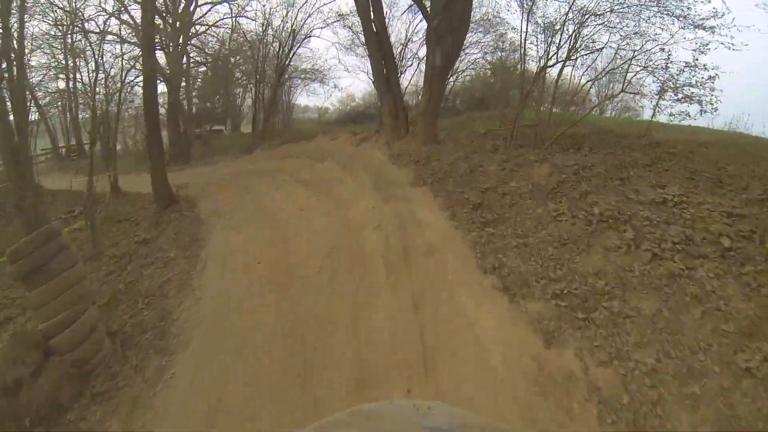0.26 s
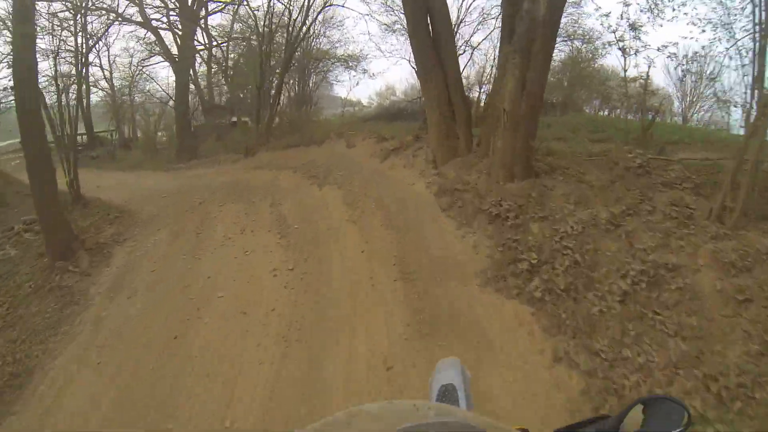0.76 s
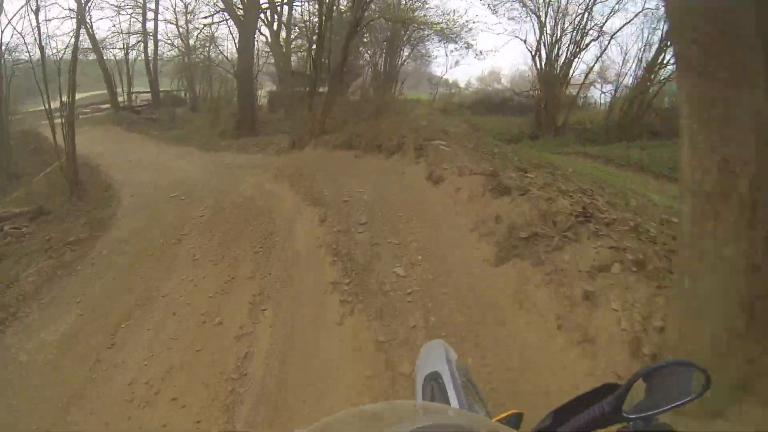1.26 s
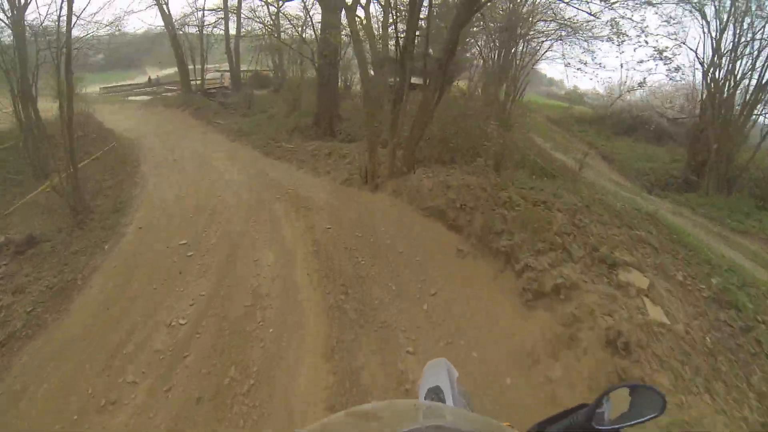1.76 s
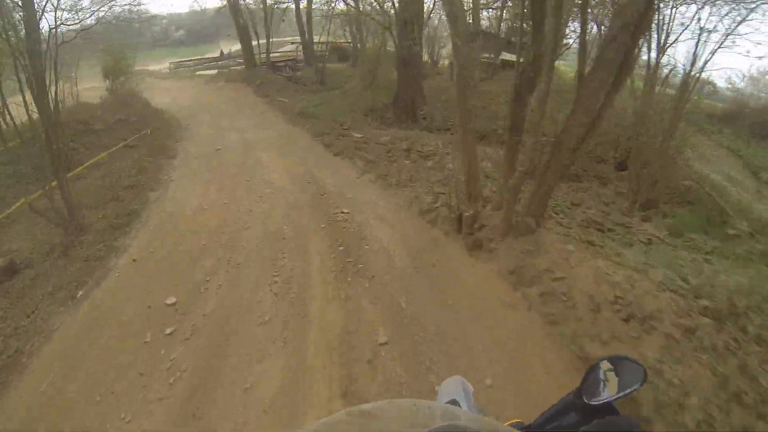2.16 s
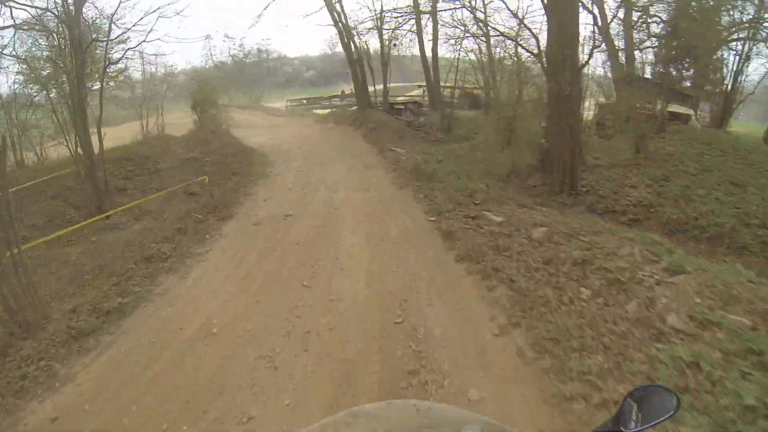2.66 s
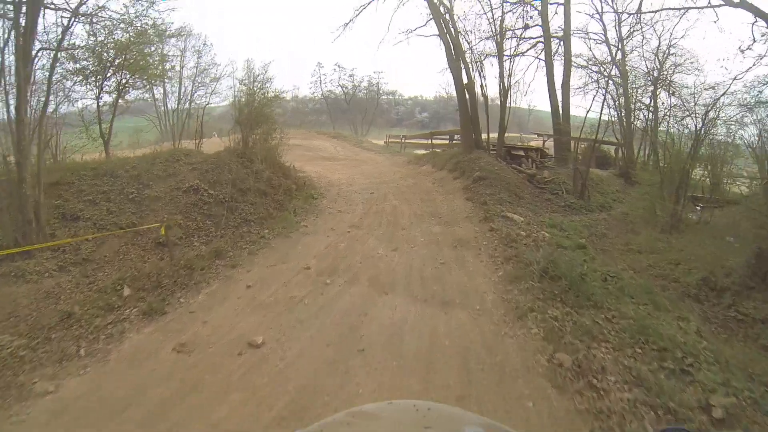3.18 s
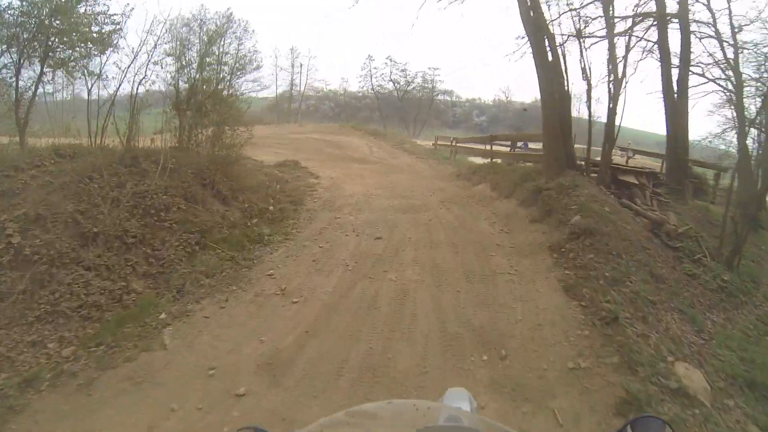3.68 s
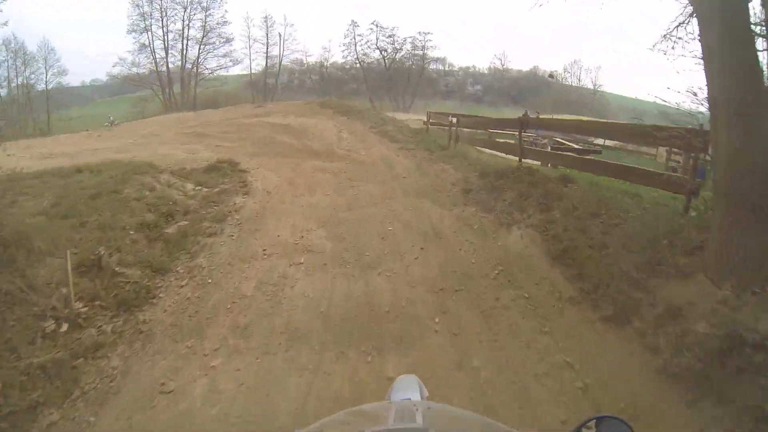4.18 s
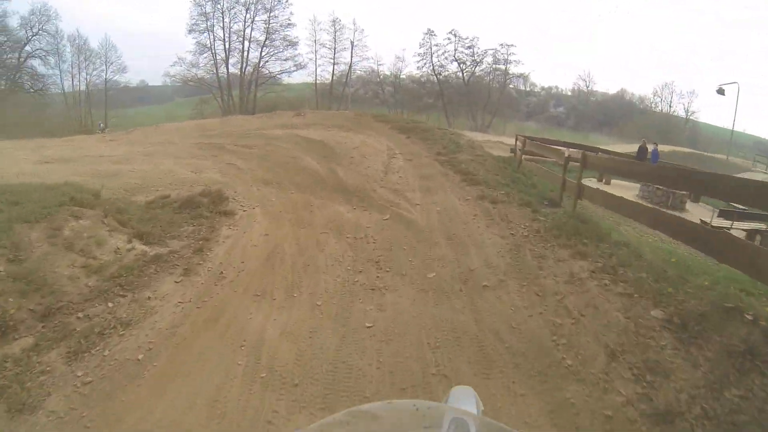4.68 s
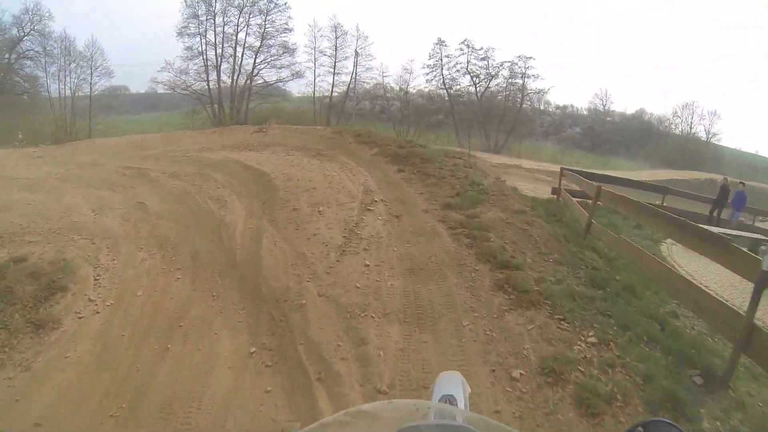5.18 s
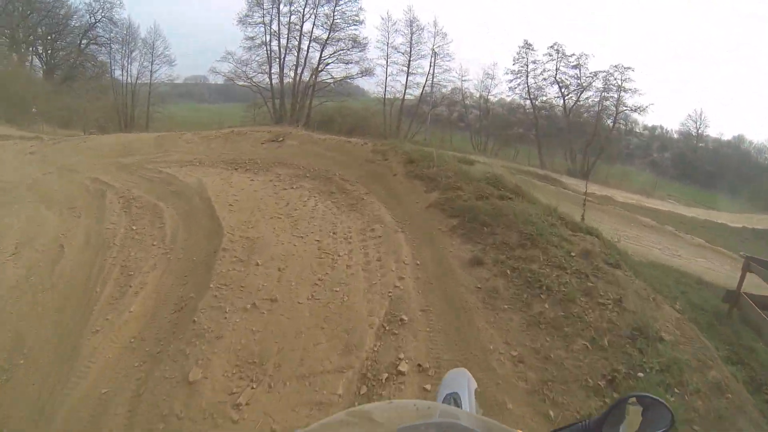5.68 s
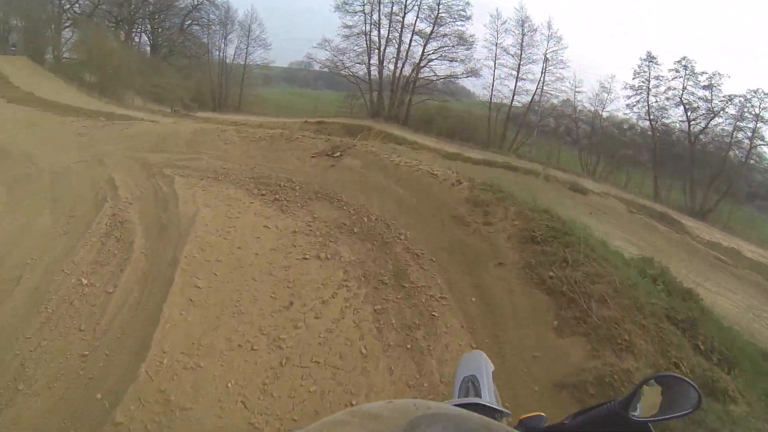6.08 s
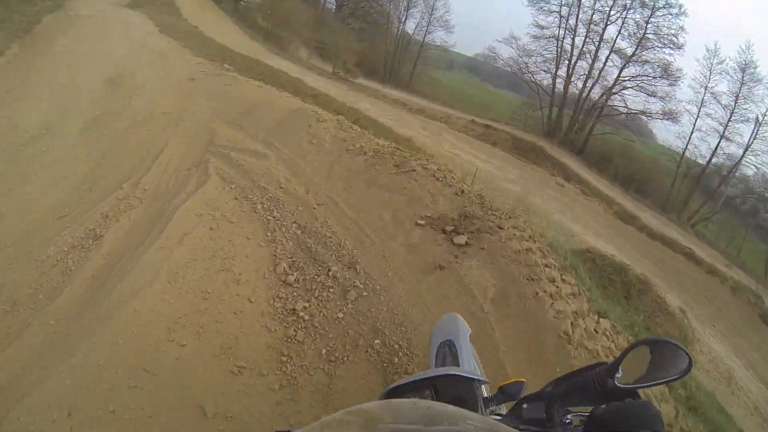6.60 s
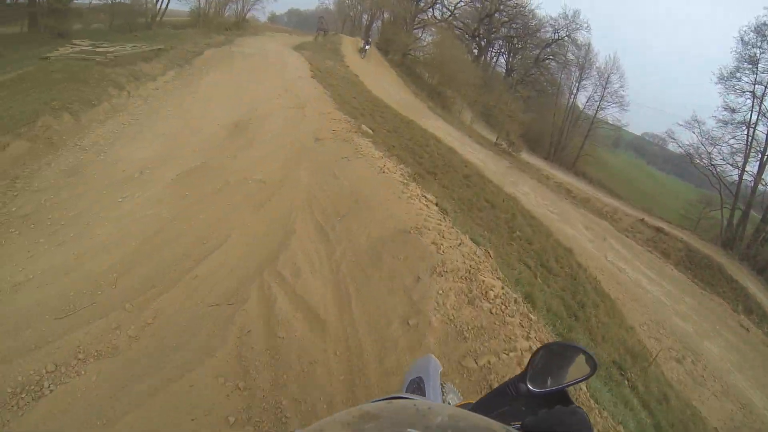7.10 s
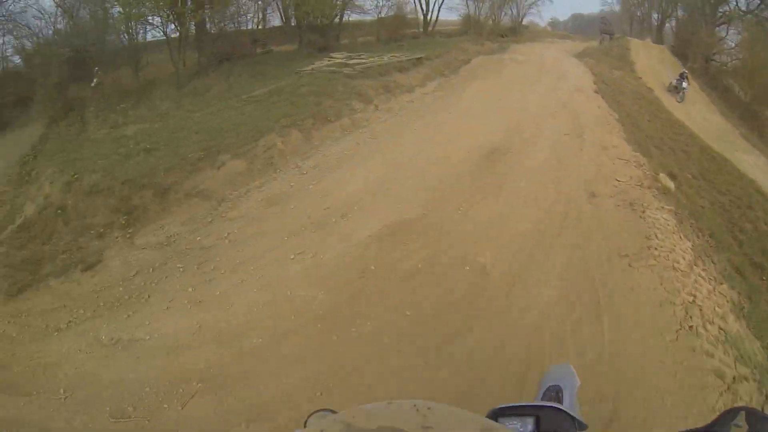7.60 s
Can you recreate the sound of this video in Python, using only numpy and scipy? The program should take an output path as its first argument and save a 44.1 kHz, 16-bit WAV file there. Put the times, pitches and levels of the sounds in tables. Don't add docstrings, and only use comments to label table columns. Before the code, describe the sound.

Close, boxy onboard sound of an off-road motorcycle: low uneven exhaust beats, chain and valve clatter, buzzing panels and deep fluttering wind on the microphone. Revs fall at first, then climb in a hard pull and waver over bumps with brief squeaks and suspension hisses. The throttle closes, a cluster of pops follows, the engine slows to a lumpy chug, and then a loud, knocking acceleration ends it.

```python
import sys
import numpy as np
from scipy import signal
from scipy.fft import rfft, irfft
from scipy.io import wavfile
from scipy.ndimage import uniform_filter1d

SR = 44100
rng = np.random.default_rng(int(sys.argv[2]) if len(sys.argv) > 2 else 0)


def level_to_linear(level):
    exponent = np.asarray(level, float) / 20
    return 10 ** exponent


def int16_out(signal):
    q = np.round(np.clip(np.atleast_2d(signal).T, -1, 1) * 32767)
    wavfile.write(sys.argv[1], SR, q.astype(np.int16))


N = 346185
time = np.arange(N) / SR
CRUISE_HZ, CRUISE_DB = 25, -40
GUST_CEILING = .9

# f/Hz, width/Hz, lift over the smooth colour/dB
CASE = [(630.7, 16.4, 9), (863, 146, 1.5), (1091, 142, 6.5), (1381, 74, 2.5), (1546, 87, 5), (1939, 150, 4),
        (2735, 680, 6), (3630, 750, 6.5), (5160, 950, 7), (6550, 1050, 9.5), (9370, 900, 2)]
# t/s, length/s, level/dB
FORK = [
    (0.03, 0.11, -45),
    (0.43, 0.047, -45),
    (3.126, 0.21, -41.5),
    (3.843, 0.13, -41.5),
    (4.108, 0.17, -41),
    (6.46, 0.076, -45.5),
]
# t/s, steady buffet/dB, shedding pitch/Hz
AIRFLOW = [(0, -11, 35.1), (.05, -28, 37), (.9, -22, 35.06), (1.48, -23, 37.93), (1.6, -32, 42.2),
           (1.85, -24, 40.8), (2.2, -25.5, 41.23), (2.45, -26.5, 46.18), (2.75, -24.5, 36.15),
           (3.3, -23, 36), (4.45, -20, 35.93), (4.95, -23, 37.12), (5.2, -23, 36.13), (6.9, -23.5, 35.75),
           (7.08, -21.5, 35.74), (7.3, -24, 35.88), (7.68, -22, 39.2), (7.85, -36, 37.6)]


def unit(x):
    return x / np.sqrt(np.mean(x ** 2))


def curves(table):
    s, *columns = np.transpose(table)
    return [np.interp(time, s, c) for c in columns]


def hiss():
    return rng.standard_normal(N)


def ring(x, hz, width):
    return signal.lfilter(*signal.iirpeak(hz, hz / width, SR), x)


def ring_twice(x, hz, width):
    return ring(ring(x, hz, width), hz, width)


def modes(x, table):
    return sum((-1) ** k * level_to_linear(db) * ring(x, hz, width) for k, (hz, width, db) in enumerate(table))


def walk(rate):
    k = int(SR / rate)
    held = np.repeat(rng.standard_normal(N // k + 1), k)
    return unit(uniform_filter1d(uniform_filter1d(held, k), k)[:N])


def steady(x, span_s):
    k = int(span_s * SR)
    return x / np.sqrt(uniform_filter1d(uniform_filter1d(x ** 2, k), k) + 1e-12)


def bump(s, length):
    return np.exp(-.5 * ((time - s) / (length / 3)) ** 2)


def colour(x, tilt_db=0):
    # f/Hz, density/dB per Hz
    rattle_spectrum = [(40, -60.5), (100, -13), (150, -23.5), (330, -24.5), (400, -22.5), (725, -27.5),
                       (820, -23.5), (1550, -25), (1750, -26.5), (3900, -42), (4400, -46.5), (5800, -56.5),
                       (7600, -59.5), (13200, -62), (14800, -86.5)]
    hz = np.linspace(1, SR / 2, 4097)
    points, db = np.transpose(rattle_spectrum)
    db = np.interp(np.log(hz), np.log(points), db) + tilt_db * np.log2(hz / 2000)
    db = db + sum(lift / (1 + (2 * (hz - f) / width) ** 2) for f, width, lift in CASE)
    cepstrum = irfft(np.log(level_to_linear(db)))
    cepstrum[1:4096] *= 2
    cepstrum[4097:] = 0
    return signal.fftconvolve(x, irfft(np.exp(rfft(cepstrum)))[:4096])[:N]


def engine():
    # t/s, firings per second/Hz
    firing = [(0, 30), (.35, 28.9), (.85, 28.2), (1.0, 26.1), (1.35, 25.2), (1.6, 24.0), (1.85, 22),
              (2.1, 21.3), (2.3, 23.28), (2.74, 27.35), (2.93, 32.1), (3.12, 30.54), (3.44, 34.65),
              (3.69, 28.97), (3.93, 32.16), (4.34, 27.46), (4.79, 28.92), (6.32, 20.76), (6.36, 19.13),
              (7.26, 17.28), (7.36, 22.4), (7.52, 22.3), (7.68, 24.4), (7.85, 25.2)]
    # pipe overtone/dB, silencer/dB, upper pipe resonance/dB
    throttle = [(0, -41, -14, 5, -15), (.05, -54, 5, 10, 4), (.2, -52.5, 6.5, -3, 0),
                (.4, -39.5, -6, -3, 4), (.62, -42, -1, 2, 7), (.7, -42, -9, 1, 5), (.8, -36.5, -14, -4, 4),
                (.92, -45, -2, -1, -6), (1.05, -40.5, -12, -1, 8), (1.3, -51, 6, -3, -10),
                (1.45, -42, -9, -8, 0), (1.6, -39.5, -5, -12, 0), (1.72, -58, 3.5, -12, 9),
                (2.15, -49.5, -4.5, -8, -3), (2.4, -38, -14, -17, 2), (2.7, -33, -12, -6, 0),
                (2.8, -31, -6.5, 8.5, 8.5), (3.1, -31, -6.5, -6, 4.5), (3.3, -30, -7, -7.5, -3),
                (3.45, -32.5, -6, -8, -6.5), (3.65, -45.5, -1, 2, 2), (3.85, -44, -0.5, -3, 1.5),
                (3.97, -35.5, -7, -5, -2), (4.2, -48.5, 2, -12, -2), (5.4, -47.5, 0.5, -8, -13),
                (5.62, -45, -11, -5.5, -5), (5.8, -49.5, -1, -4, 2), (6.2, -50.5, 0.5, -17.5, 2),
                (6.75, -43, -2, -11, -11.5), (7.15, -41.5, -6.5, -12.5, -10.5),
                (7.35, -28, -11.5, -12, -10.5), (7.55, -31, -10, -12.5, -3.5), (7.85, -30, -23, -6, -2)]
    # t/s, level/dB
    drone = [(0.0, -31), (0.06, -54), (0.39, -37.5), (1.11, -40), (1.16, -51), (1.73, -39.5), (1.86, -64),
             (1.97, -46), (2.71, -40.5), (2.8, -40), (3.02, -47), (3.45, -43.5), (5.27, -41), (5.53, -48),
             (6.78, -41.5), (6.97, -50.5), (7.83, -36.5), (7.85, -42)]
    # order of the firing rate, level/dB
    frame_orders = [(2, 2.3), (4, -1.6)]
    rate_hz = curves(firing)[0]
    boom_db, bright_db, low_db, high_db = curves(throttle)
    overtone_db = boom_db + bright_db + 1.7 * walk(6)
    hum_db = curves(drone)[0] - 3 + 0.37 * walk(4)
    rattle_db = rattle_level(rate_hz, boom_db)

    cycles = np.cumsum(rate_hz) / SR + .834
    fired = np.flatnonzero(np.diff(np.floor(cycles)) > 0)
    chance = rng.standard_normal((len(fired), 2))
    pulses = np.zeros(N)
    jitter = (.00015 * SR * chance[:, 0]).astype(int)
    pulses[np.clip(fired + jitter, 0, N - 1)] = level_to_linear(1.5 * chance[:, 1])
    gas = np.exp(-(cycles % 1) / 1.5) * hiss()

    blows = exhaust_blows(fired, chance, rate_hz, boom_db)
    out = level_to_linear(boom_db) * steady(exhaust_boom(blows, gas, low_db, high_db), .15)
    out = out + level_to_linear(overtone_db) * steady(pipe_overtone(pulses, gas), .15)
    out = out + level_to_linear(hum_db) * steady(airbox_hum(pulses, rate_hz), .15)
    out = out + level_to_linear(rattle_db) * steady(rattle(cycles, rate_hz, boom_db), .15)
    shake = sum(level_to_linear(db + 2 * walk(14)) * np.sin(2 * np.pi * order * cycles) for order, db in frame_orders)
    return out + level_to_linear(hum_db) * shake


def exhaust_blows(fired, chance, rate_hz, boom_db):
    # t/s, level over a plain blow/dB
    pops = [
        (1.21, 6.5),
        (5.278, 3.5),
        (5.353, 10.5),
        (5.39, 11.5),
        (5.472, 15.5),
        (5.593, 18),
        (5.675, 18.5),
    ]
    blowdown_cycles, pipe_lead_s, sweep_s = .35, .009, .0022
    rate = rate_hz[fired]
    first_s = blowdown_cycles / rate - pipe_lead_s - sweep_s
    unevenness_db = np.clip((-30 - boom_db[fired]) / 8, 1, 1.8)
    blows, late = np.zeros(N), np.zeros(N)
    for train, wait_s in ((blows, first_s), (late, first_s + .5 / rate)):
        delay = (SR * (wait_s + .0002 * chance[:, 0])).astype(int)
        train[np.clip(fired + delay, 0, N - 1)] = level_to_linear(unevenness_db * chance[:, 1])
    for s, db in pops:
        blows[int(s * SR)] += level_to_linear(db)
    echo = np.clip((25.5 - rate_hz) / 3.5, 0, 1)
    echo = echo * np.clip((boom_db + 38) / 8, .15, 1)
    return blows + .65 * echo * late


def exhaust_boom(blows, gas, low_db, high_db):
    # f/Hz, width/Hz, level/dB
    boom_modes = [
        (193.3, 31.4, -2),
        (233.3, 29, 1.5),
        (266, 44.5, 0),
    ]
    sweep_s = .0022
    exhaust = unit(ring(blows, 260, 300)) + .15 * unit(ring(gas, 260, 300))
    parts = []
    for k, mode in enumerate(boom_modes):
        part = ring(modes(exhaust, [mode]), mode[0], 2 * mode[1])
        parts.append(np.roll(part, int(k * sweep_s * SR)))
    low, middle, high = parts
    boom = ring(middle - level_to_linear(low_db + 9) * low - level_to_linear(high_db - 0.5) * high, 229, 210)
    return boom + level_to_linear(-7.5) * ring(ring(exhaust, 690, 70), 385, 120)


def pipe_overtone(pulses, gas):
    # f/Hz, width/Hz, level/dB
    overtone_modes = [
        (329.4, 41.6, -1),
        (362.4, 27, -8.5),
    ]
    drive = unit(ring(pulses, 300, 430)) + 0.29 * unit(ring(gas, 300, 300))
    return ring(modes(drive, overtone_modes), 315, 95)


def airbox_hum(pulses, rate_hz):
    # f/Hz, width/Hz, level/dB
    hum_modes = [
        (93, 22, 0),
        (116.6, 37, 0),
    ]
    fast = np.clip((rate_hz - 19) / 11, 0, 1)
    breath = unit(ring(pulses, 105, 100)) + .3 * unit(ring(hiss(), 105, 100))
    shares = (1 - fast, fast)
    return sum(share * ring(modes(breath, [mode]), mode[0], 60) for share, mode in zip(shares, hum_modes))


def rattle(cycles, rate_hz, boom_db):
    throb = (0.19 + 0.0152 * (boom_db - CRUISE_DB)) * np.clip((35 - rate_hz) / 9, .45, 1)
    throb = np.clip(throb, 0, 1)
    phase = cycles % 1
    gate = unit(np.exp(-phase / 0.31) + 0.067 * np.exp(-((phase + .5) % 1) / 0.11))
    beat = 1 - throb + throb * uniform_filter1d(gate, size=150)
    grit = level_to_linear(2.33 * np.minimum(rng.exponential(size=N), 6) * (rng.random(N) < .1))
    out = colour(hiss() * grit * beat * level_to_linear(0.57 * walk(15)))
    out = out + sum(0.17 * walk(16) * ring(out, hz, width / 2) for hz, width, _ in CASE)
    thin = [hz * drift for hz, *_ in CASE[1:6] for drift in (.96, 1.03)]
    return out + sum(0.43 * np.maximum(walk(9), 0) * ring(out, hz, 33) for hz in thin)


def rattle_level(rate_hz, throttle_db):
    # level at cruise/dB, per octave of speed/dB, per throttle dB, per shaking dB, bump/dB, wander/dB
    law = (-38.5, 3, 0.0139, 1, 0.5, 0.48)
    # t/s, level/dB
    shaking = [(0, 2.5), (.1, 3.5), (.5, 2), (1.5, .5), (2.05, -1), (2.7, 1.5), (3.5, 3), (4.2, 1.5),
               (4.5, 1), (5.1, 1.5), (5.9, -2.5), (6.4, -2.5), (7.1, -2.5), (7.45, 0), (7.85, 1.5)]
    cruise_db, per_octave_db, per_throttle, per_shaking, bump_db, wander_db = law
    bumps = sum(bump(s, length) for s, length, _ in FORK)
    engine_db = per_octave_db * np.log2(rate_hz / CRUISE_HZ) + per_throttle * (throttle_db - CRUISE_DB)
    return cruise_db + engine_db + per_shaking * curves(shaking)[0] + bump_db * bumps + wander_db * walk(6)


def knocks():
    # t/s, peak/dB, treble/dB
    hard_firings = [(2.688, -26.5, -27), (2.766, -22.5, -26), (2.8, -22, -32), (2.835, -22, -37),
                    (2.866, -21, -36), (2.9002, -48, -27), (2.928, -26.5, -20), (6.8864, -26.5, -37),
                    (6.9397, -26.5, -33.5), (7.0494, -30, -27), (7.222, -24.5, -35), (7.280, -22, -30),
                    (7.329, -20, -21.5), (7.3777, -17, -29.5), (7.421, -17, -34), (7.465, -18.5, -37),
                    (7.5118, -17.5, -32), (7.5542, -21, -22.5), (7.5979, -21.5, -30), (7.6364, -25.5, -29),
                    (7.682, -20.5, -32), (7.7238, -20, -41), (7.764, -20.5, -28), (7.802, -25.5, -33),
                    (7.8375, -37, -25)]
    # f/Hz, width/Hz, level/dB
    crankcase = [
        (1109, 92, -5.5),
        (1544, 95, 6),
        (2035, 70, -6),
        (2850, 230, -12.5),
        (3760, 145, -7),
    ]
    span, lead_s = 2000, .012
    rebound_s = .0075
    body, top = np.zeros(N + span), np.zeros(N + span)
    age = time[:span] - lead_s
    fall = np.exp(-age / .005) + .8 * np.exp(-age / .0006)
    swell = np.where(age < 0, .35 * np.exp(age / .006), fall)
    swell = swell + 0.38 * (age > rebound_s) * np.exp(-np.abs(age - rebound_s) / 0.01)
    fall = np.exp(-age / 0.0018) + 0.52 * np.exp(-((age - rebound_s) / 0.0011) ** 2)
    crack = np.where(age < 0, np.exp(age / 0.0013), fall)
    for s, db, treble_db in hard_firings:
        noise = rng.standard_normal((2, span))
        thud = noise[0] * swell
        k = int((s - lead_s) * SR)
        body[k:k + span] += level_to_linear(db) * thud * np.linalg.norm(swell) / np.linalg.norm(thud)
        top[k:k + span] += level_to_linear(db + treble_db) * noise[1] * crack
    ringing = level_to_linear(7) * modes(body[:N], crankcase)
    clatter = colour(body[:N], tilt_db=4.0) / np.std(colour(hiss(), tilt_db=-1.0))
    treble = ring(colour(top[:N], tilt_db=11.5), 7200, 11000) / np.std(colour(hiss(), tilt_db=16.0))
    return ringing + level_to_linear(-5) * ring(clatter, 1800, 2400) + level_to_linear(4.5) * ring(treble, 6700, 9000)


def wind():
    hz, buffet_db = airflow()
    slow_db = buffet_db - 4.5 + 5.5 * np.minimum(walk(12), GUST_CEILING)
    tone = np.sqrt(2) * np.cos(2 * np.pi * np.cumsum(hz * (1 + 0.04974 * walk(12))) / SR)
    eddies = unit(ring_twice(hiss(), 35.8, 18.9))
    slow = ring(ring_twice(hiss(), 19.5, 19), 23.8, 33)
    buffets = level_to_linear(buffet_db + 1.5 * walk(50)) * steady(tone + .4 * eddies, .04)
    pressure = level_to_linear(slow_db) * steady(slow, .05)
    rumble = level_to_linear(curves(AIRFLOW)[0] - 13 + 2.5 * walk(14)) * unit(ring_twice(hiss(), 62, 30))
    low_pass = signal.butter(3, 64, fs=SR, output="sos")
    return signal.sosfiltfilt(low_pass, buffets + pressure + rumble, padtype="even")


def airflow():
    # t/s, level/dB, length/s, shedding pitch/Hz
    gust_events = [(0.082, -6.5, 0.084, 36.1), (0.224, -17.5, 0.028, 36.9), (0.306, -22.5, 0.026, 37.2),
                   (0.348, -17.5, 0.03, 38.7), (0.474, -17, 0.023, 40), (0.598, -15.5, 0.071, 36.5),
                   (0.737, -11, 0.07, 37.4), (0.947, -15.5, 0.047, 39.3), (1.141, -13, 0.17, 36.36),
                   (1.24, -21, 0.063, 33.7), (1.381, -11, 0.16, 36.9), (2.158, -19, 0.059, 36.4),
                   (2.231, -19, 0.042, 36.5), (3.205, -19.5, 0.05, 36.56), (3.274, -19, 0.034, 34.7),
                   (3.363, -22, 0.071, 38.6), (3.488, -15.5, 0.11, 41), (3.579, -16.5, 0.02, 36.7),
                   (3.663, -21.5, 0.037, 36.9), (3.762, -10, 0.039, 33.9), (3.848, -16, 0.067, 34.6),
                   (3.922, -20.5, 0.051, 33), (3.984, -12.5, 0.073, 34.4), (4.168, -11, 0.1, 35.9),
                   (4.281, -10.5, 0.045, 37.98), (4.349, -19, 0.061, 39.2), (4.544, -16.5, 0.075, 32.66),
                   (4.759, -16, 0.075, 36.1), (4.876, -15, 0.038, 41.9), (4.905, -24.5, 0.031, 38.7),
                   (5.019, -22, 0.092, 35.8), (5.146, -18, 0.11, 42.7), (5.288, -18.5, 0.099, 38.4),
                   (5.368, -15.5, 0.036, 37.9), (5.39, -19, 0.033, 39.1), (5.513, -20.5, 0.053, 36.57),
                   (5.576, -16, 0.035, 36.4), (5.769, -18, 0.071, 40.9), (5.834, -7, 0.037, 36.7),
                   (5.969, -8, 0.15, 37.2), (6.191, -17, 0.084, 39.03), (6.332, -15, 0.054, 36.5),
                   (6.461, -19.5, 0.061, 36.5), (6.562, -13, 0.11, 37.75), (6.68, -14.5, 0.055, 35.5),
                   (6.764, -20, 0.065, 36.83), (7.135, -23.5, 0.089, 33.3), (7.343, -17, 0.087, 36.15),
                   (7.526, -19.5, 0.11, 37.44), (7.662, -34, 0.08, 41.2)]
    lulls = [.04, .33, .42, .67, .85, .93, 1.02, 1.32, 1.61, 1.7, 1.76, 1.88, 2.05, 2.2, 2.38, 2.67, 2.74,
             2.83, 3.09, 3.26, 3.42, 3.73, 3.94, 4.07, 4.47, 4.61, 4.84, 4.95, 5.21, 5.43, 5.46, 5.485,
             5.64, 5.72, 5.8, 6.1, 6.245, 6.27, 6.38, 6.86, 7.18, 7.195, 7.29, 7.45, 7.59, 7.74]
    stream_db, stream_hz = curves(AIRFLOW)
    flutter_db = -0.5 * np.minimum(walk(22), GUST_CEILING)
    total = level_to_linear(2 * (stream_db + flutter_db))
    weighted_hz = total * stream_hz
    for s, db, length, hz in gust_events:
        power = level_to_linear(2 * db) * gust(s, length)
        total = total + power
        weighted_hz = weighted_hz + power * hz
    lull_db = -5.5 * sum(bump(s, 0.053) for s in lulls)
    return weighted_hz / total, 10 * np.log10(total) + lull_db


def gust(s, length):
    wake = np.exp(-2 * np.maximum(time - s, 0) / 0.0902) * (1 - bump(s, length)) * (time > s)
    return bump(s, length) ** 2 + level_to_linear(2 * -4) * wake


def chassis():
    # t/s, peak/dB, f/Hz, width/Hz
    stones = [(.428, -58, 9500, 2500), (2.836, -30, 1850, 300), (2.845, -31, 1900, 300),
              (2.806, -34, 1800, 300), (2.783, -34, 1950, 300), (2.972, -35, 1500, 400),
              (4.976, -32, 600, 900), (2.776, -36, 1900, 400), (6.501, -27, 1400, 900),
              (6.652, -47, 4200, 2500), (6.657, -47, 4500, 2500), (6.688, -56, 6500, 2000),
              (6.715, -54, 5200, 1500), (6.738, -36, 1200, 600)]
    # t/s, length/s, f/Hz, level/dB, glide/Hz per s
    squeaks = [(3.63, .14, 6200, -66, 0), (4.79, .09, 975, -40, -500), (4.85, .07, 910, -40, -200),
               (6.45, .2, 650, -50, 0), (7.13, .09, 6750, -61, 0), (3.47, .07, 1450, -43, 0),
               (3.59, .12, 1560, -47, 0), (3.79, .09, 1340, -45, -300), (3.9, .08, 905, -43, 0),
               (4.09, .12, 1570, -45, -300), (4.66, .1, 1540, -49, 0), (5.04, .09, 1545, -44, 0),
               (5.14, .1, 1100, -47, 0), (5.44, .07, 1540, -46, 0), (5.57, .07, 1540, -47, 0),
               (5.73, .07, 1550, -48, 0)]
    oil = ring(colour(hiss(), tilt_db=4.5), 3800, 11000)
    out = sum(level_to_linear(db) * bump(s, length) for s, length, db in FORK) * unit(oil)
    for s, db, hz, width in stones:
        age = np.maximum(time - s, 0)
        contact = (1 - np.exp(-age / .0005)) * np.exp(-age / .0035)
        out = out + level_to_linear(db + 2) * contact * unit(ring_twice(hiss(), hz, width))
    for s, length, hz, db, glide in squeaks:
        pitch_hz = glide * (time - s) + hz * (1 + .006 * walk(40))
        wavering = np.sin(2 * np.pi * np.cumsum(pitch_hz) / SR)
        out = out + level_to_linear(db + 3 * walk(60)) * bump(s, length) * wavering
    return out


def camera():
    # f/Hz, level/dB
    whine_lines = [(10598, -88), (10645, -87), (10693, -91), (10789, -90), (10837, -88), (10885, -91),
                   (10981, -92), (13139, -96)]
    whine = sum(np.sqrt(2) * level_to_linear(db) * np.sin(2 * np.pi * (hz * time + rng.random())) for hz, db in whine_lines)
    return whine + level_to_linear(-76) * unit(ring_twice(hiss(), 10500, 6000))


def scene():
    return (engine() + knocks() + wind() + chassis() + camera())[None]


def roll_off(x):
    return signal.sosfilt(signal.butter(12, 15700, fs=SR, output="sos"), x)


def record(dry):
    ceiling = 1.5
    return roll_off(ceiling * np.tanh(dry / ceiling))


dry = scene()
out = record(dry)
int16_out(out)
```